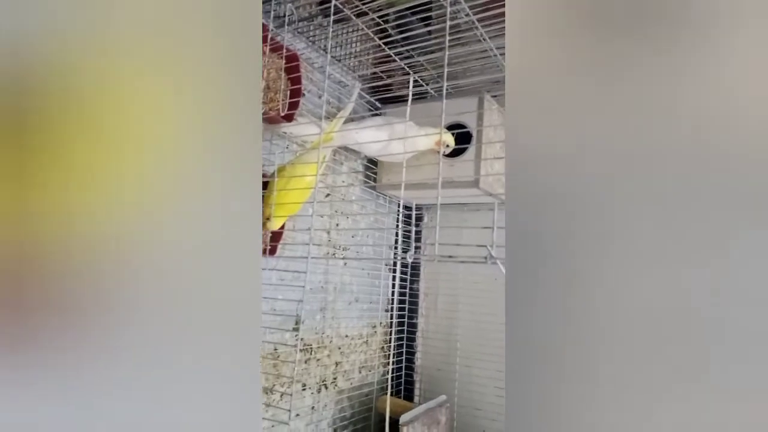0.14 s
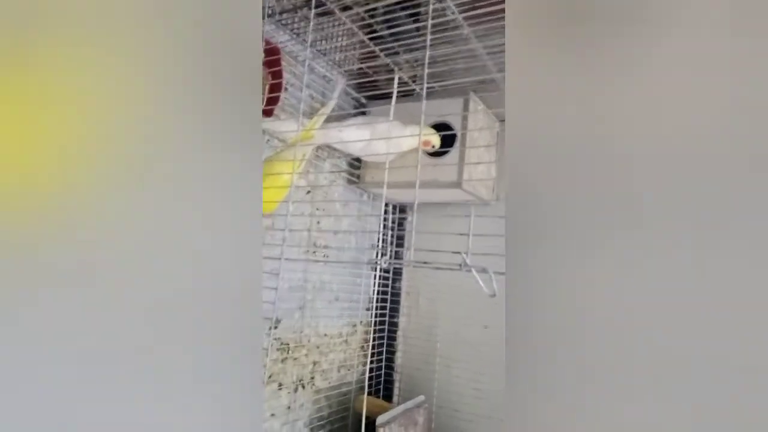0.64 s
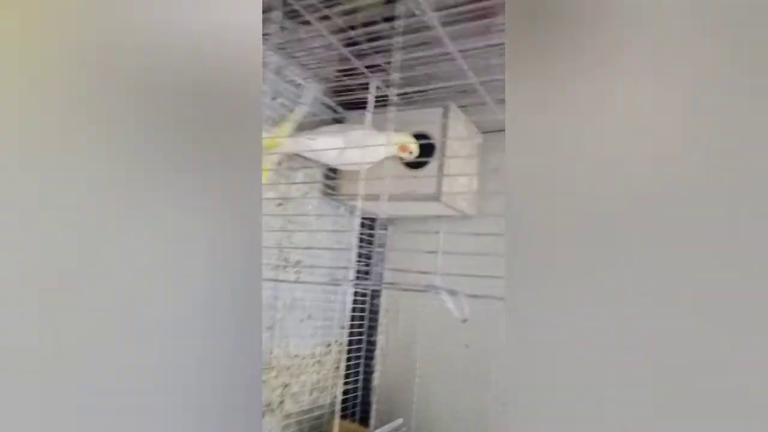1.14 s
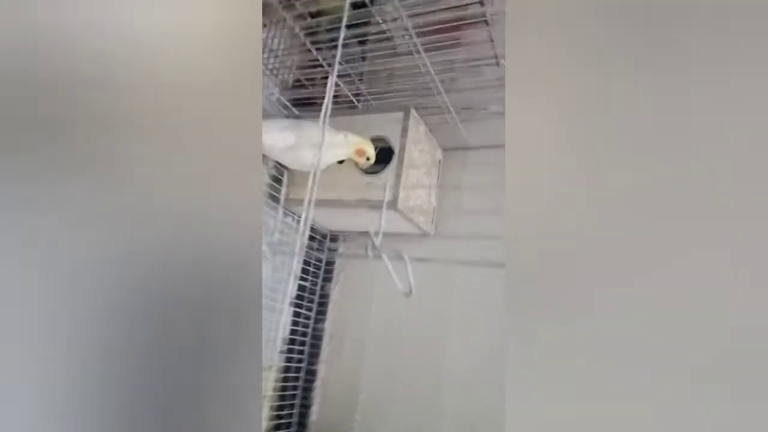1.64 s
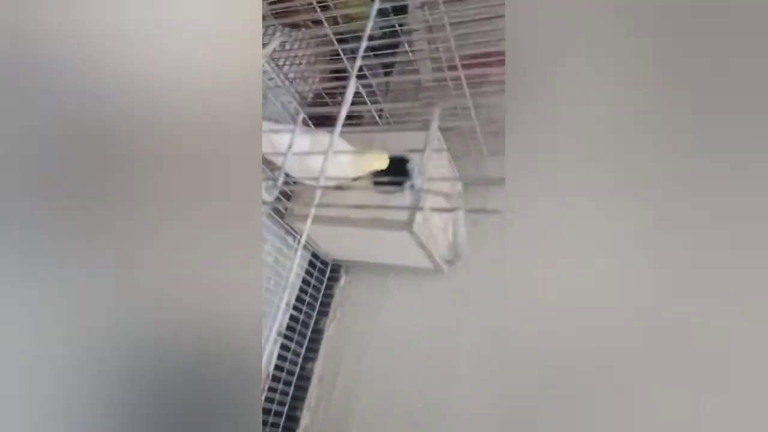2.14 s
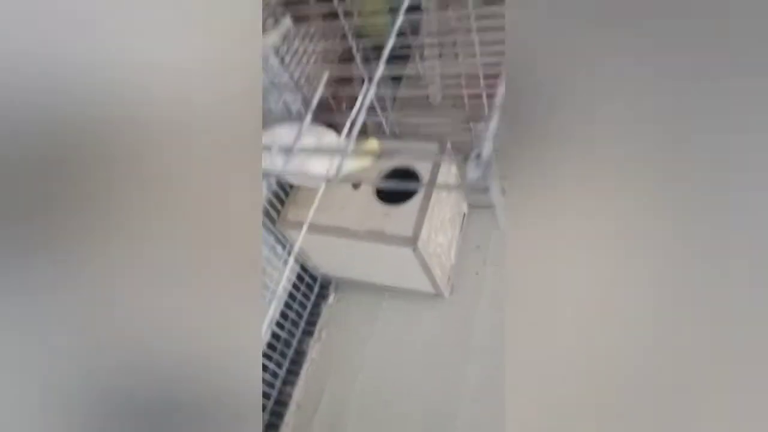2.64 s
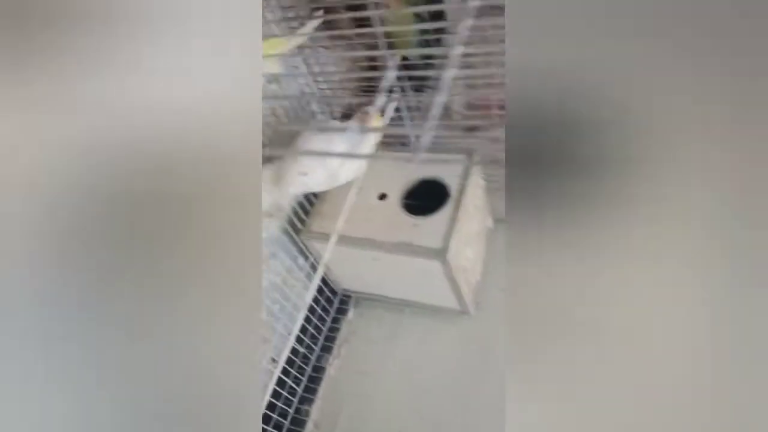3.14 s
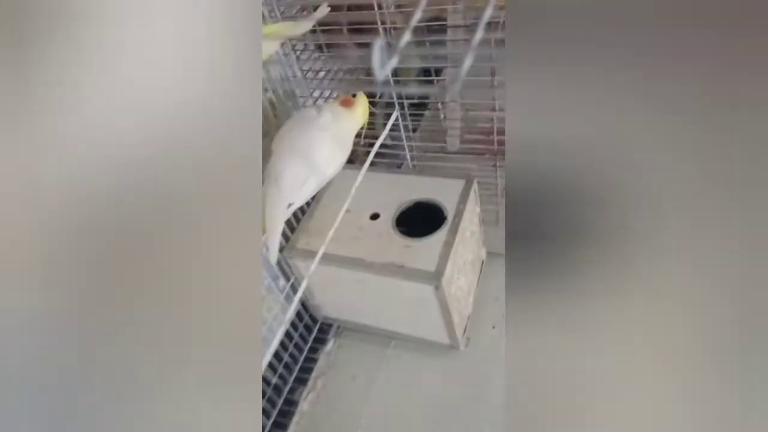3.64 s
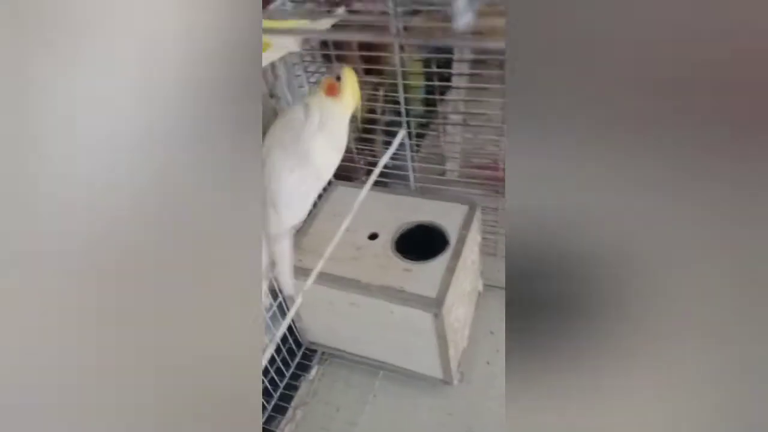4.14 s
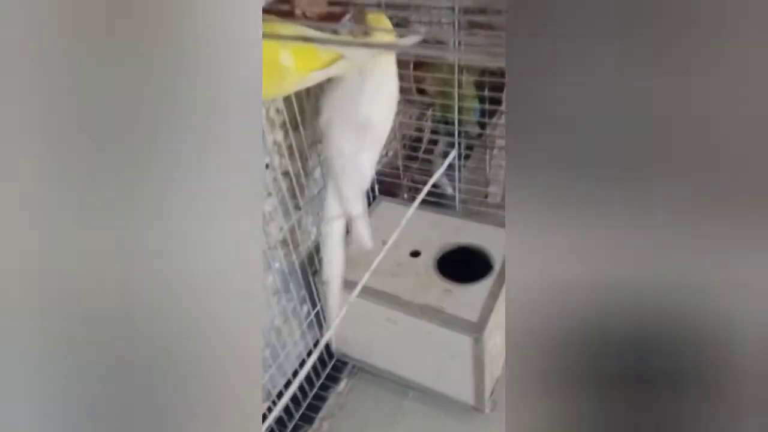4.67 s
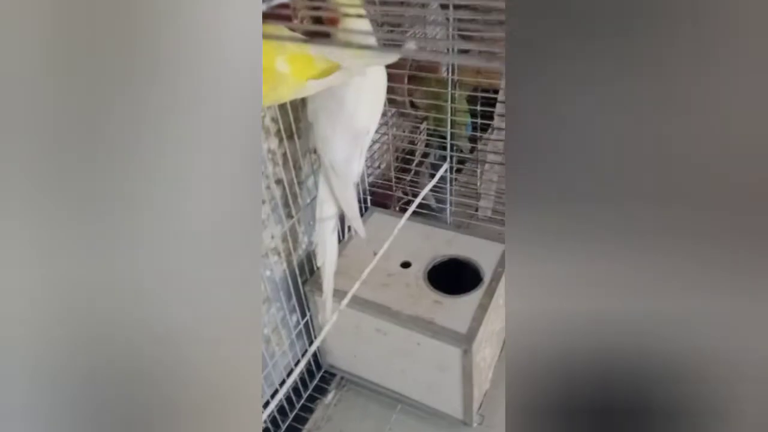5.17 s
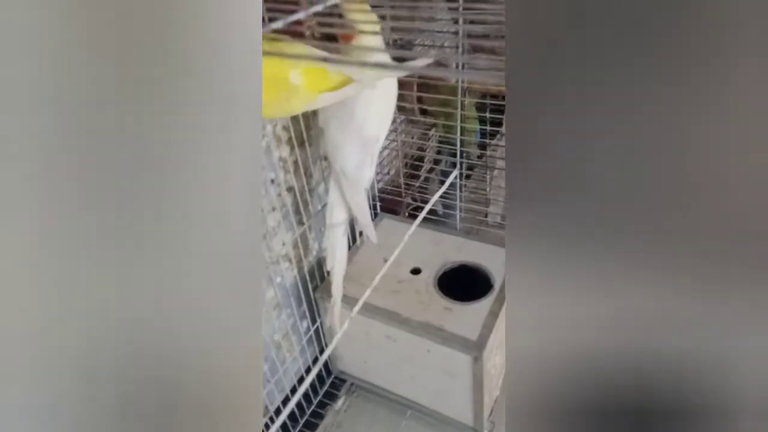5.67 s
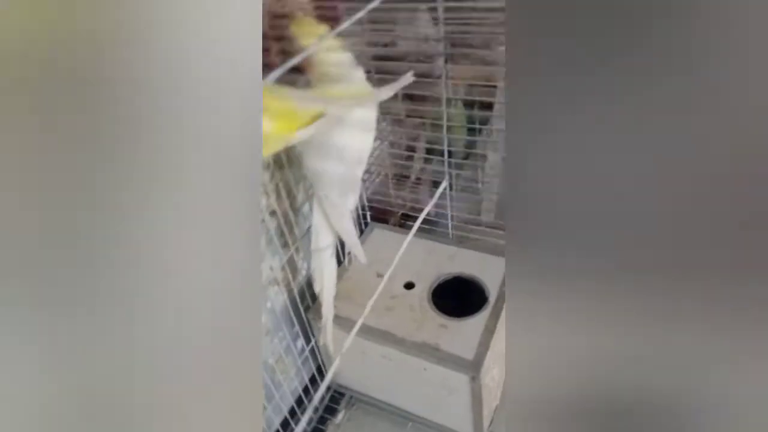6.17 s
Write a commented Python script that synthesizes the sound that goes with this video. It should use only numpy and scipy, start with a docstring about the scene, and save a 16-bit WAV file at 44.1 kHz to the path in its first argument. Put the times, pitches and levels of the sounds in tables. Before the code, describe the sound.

In a hard-walled room, small parrots give sparse chirps, nasal squawks and dry rasps over faint street rumble, claws tapping a hollow wooden box.

```python
"""A hard-walled room with small caged parrots, close to a hand-held phone; street rumble and far tones lie below.
The birds whistle (gliding near-sines), squawk (harmonic stacks) and rasp (trains of noisy air bursts).
Claws knock and shuffle on a wooden nest box (ringing modes), among short bright ticks (crack and ring) and grainy
treble swells. Filtered noise makes the rumble, room air and faint top rustles; sparse echoes make the room.
The phone's noise suppressor lowers the treble whenever it sinks near its floor."""
import sys
import numpy as np
from scipy import signal
from scipy.fft import rfft, irfft, next_fast_len
from scipy.io import wavfile
from scipy.ndimage import uniform_filter1d

SR = 44100
rng = np.random.default_rng(int(sys.argv[2]) if len(sys.argv) > 2 else 0)


def to_wav(sig):
    """Store sig (one row per channel, or 1-D mono) as 16-bit WAV at the path in sys.argv[1].

    Samples outside -1..1 are clipped; the rate is SR.
    """
    pcm = np.clip(np.atleast_2d(sig), -1, 1) * 32767
    pcm = np.round(pcm).astype(np.int16)
    wavfile.write(sys.argv[1], SR, pcm.T)  # frames by channels


def to_linear_factor(level_db):
    """Convert decibel levels (scalar or array-like) to linear amplitude factors."""
    exponent = np.asarray(level_db, float) / 20
    return 10 ** exponent


N = 277830


def evened(x):
    """Scales to rms 1."""
    return x / np.sqrt(np.mean(x ** 2) + 1e-20)


def read(points, hz):
    """Reads a spectrum on a log-frequency axis."""
    f, value = np.transpose(points)
    return np.interp(np.log(hz + 1), np.log(f + 1), value)


def add(mix, s, sound):
    """Mixes a sound in at time s."""
    part = mix[round(s * SR):][:len(sound)]
    part += sound[:len(part)]


def coloured(x, gain):
    """Filters by a gain given as a function of frequency."""
    return irfft(rfft(x) * gain(np.fft.rfftfreq(len(x), 1 / SR)), len(x))


def wobble(size, span):
    """Slow random drift of rms 1, smoothed twice over span samples."""
    return evened(uniform_filter1d(uniform_filter1d(rng.standard_normal(size), span), span))


# swell of the street above about 90 Hz: (time [s], level [dB])
RUMBLE_SWELL = [(0.0, -81.5), (1.19, -75), (1.61, -67), (1.912, -75.5), (2.389, -75.5), (2.79, -65.5),
                (3.16, -71), (3.58, -69.5), (3.74, -75), (4.51, -63.5), (4.769, -70), (5.509, -67.5),
                (6.3, -76.5)]
# colour of the street noise: (frequency [Hz], relative level [dB])
STREET_COLOUR = [(25, -28), (59, 8), (165, -5), (237, -14.5), (429, -12.5), (525, -23.5), (800, -21.5),
                 (1040, -28.5), (1760, -120)]
DEEP_DB, DEEP_SWING = -82, 0.86  # mean level below 90 Hz; dB of deep swell per dB of upper swell


def street_rumble():
    """Lumpy low noise in two bands split near 90 Hz, swelling together."""
    t = np.arange(N) / SR
    s, upper_db = np.transpose(RUMBLE_SWELL)
    deep_db = DEEP_DB + DEEP_SWING * (upper_db - upper_db.mean())
    deep_gain = lambda hz: to_linear_factor(read(STREET_COLOUR, hz)) / (1 + (hz / 90) ** 6)
    upper_gain = lambda hz: to_linear_factor(read(STREET_COLOUR, hz)) / (1 + (90 / (hz + 1)) ** 6)
    deep = evened(coloured(rng.standard_normal(N), deep_gain))
    upper = evened(coloured(rng.standard_normal(N), upper_gain))
    deep = deep * to_linear_factor(np.interp(t, s, deep_db) + 2.88 * wobble(N, 2500))
    return deep + upper * to_linear_factor(np.interp(t, s, upper_db) + 1.0 * wobble(N, 900))


# colour of the room air: (frequency [Hz], relative level [dB])
AIR_COLOUR = [(500, 1), (868, -10.5), (1060, -9), (1870, -11), (4210, -19.5), (6510, -26.5), (16000, -27)]
AIR_DB = -78


def room_air():
    """A thin, nearly steady hiss of noise."""
    gain = lambda hz: to_linear_factor(read(AIR_COLOUR, hz)) / (1 + (700 / (hz + 1)) ** 4)
    air = evened(coloured(rng.standard_normal(N), gain))
    return air * to_linear_factor(AIR_DB + 0.12 * wobble(N, 500))


# far tones from the street: (start [s], end [s], mean frequency [Hz], mean peak level [dB])
FAR_TONES = [(0, 0.487, 192, -78.5), (1.283, 1.642, 195.6, -65), (2.965, 3.55, 350.3, -70),
             (3.132, 3.628, 786, -73.5), (5.02, 5.125, 434, -61.5), (5.12, 5.287, 402.5, -68),
             (5.353, 5.649, 150, -66)]


def far_tones():
    """Sines that waver in pitch and level and fade in and out."""
    out, t = np.zeros(N), np.arange(N) / SR
    for t0, t1, hz, db in FAR_TONES:
        fade = np.clip(np.minimum(t - t0, t1 - t) / 0.021, 0, 1)
        level = to_linear_factor(db + 4.5 * wobble(N, 600))
        cycles = np.cumsum(hz * (1 + .015 * wobble(N, 1200))) / SR
        out += level * fade * np.sin(2 * np.pi * cycles)
    return out


RUSTLES_PER_S, RUSTLE_DB, RUSTLE_HZ = 7.3, -93, 15430  # mean rate, overall rms level, centre


def rustles():
    """Sparse soft puffs of the highest treble at random times, a few of them larger."""
    starts = rng.random(N) < RUSTLES_PER_S / SR
    size = to_linear_factor(4.67 * np.minimum(rng.exponential(1, N), 1.6)) * starts
    n = np.arange(3000)
    swell = to_linear_factor(-60 * n / SR / 0.058) * np.minimum(n / 150, 1)
    puffs = signal.fftconvolve(size, swell)[:N] * rng.standard_normal(N)
    gain = lambda hz: 0.075 * (hz > 3000) + 1 / (1 + ((hz - RUSTLE_HZ) / 900) ** 2)
    return to_linear_factor(RUSTLE_DB) * evened(coloured(puffs, gain))


# short bright ticks: (time [s], peak level of the crack [dB], centre frequency [Hz])
BRIGHT_TICKS = [(0.2189, -62.5, 3760), (1.068, -59, 1882), (1.4634, -38.5, 12240), (2.15, -52.5, 14800),
                (2.81, -60.5, 2440), (4.6565, -53, 15730), (4.896, -49, 9400), (5.3071, -51.5, 7960),
                (5.967, -56, 14800), (6.1785, -47, 15200)]


def ticks():
    """A noise crack of a few milliseconds, with a faint brief ring at the tick's own pitch."""
    out, t = np.zeros(N), np.arange(4096) / SR
    for s, db, centre_hz in BRIGHT_TICKS:
        crack = rng.standard_normal(4096) * to_linear_factor(-60 * t / 0.0073) * np.minimum(t / 0.00062, 1)
        crack = coloured(crack, lambda hz: 0.39 * (hz > 1500) + 1 / (1 + ((hz - centre_hz) / 2500) ** 2))
        ring_level = to_linear_factor(-30 - 60 * t / .04 + 3 * wobble(4096, 100))
        ring = ring_level * np.sin(2 * np.pi * centre_hz * t)
        add(out, s, to_linear_factor(db) * (crack / abs(crack).max() + ring))
    return out


# voicing and distance of the calls: (from [s], overtone lift [dB], slope above the 2nd partial [dB/octave],
# hoarseness [dB], room echo [dB])
CALL_VOICES = [(0, -12, 3, -22, -7.5), (.6, -21, -2, -40, -7), (.85, 7, -8.5, -22, -3.5),
               (1.06, 16.5, 6.5, -14, -4.5), (1.1, -0.5, -6, -12, -2), (1.19, 15, -10, -8, -2.5),
               (1.255, 5.5, 4, -14.5, -2.5), (1.395, 5, -9.5, -15.5, -4.5), (1.6, 1.5, 2, -19, -8.5),
               (1.77, -6.5, -0.5, -23, -6.5), (1.95, -15, 0.5, -48, -8.5), (2.24, -7, 1.5, -26, -2.5),
               (2.29, -6.5, -1, -15.5, -7.5), (2.44, -11, 7, -41, -10), (2.6, -3.5, 18.5, -30, -7),
               (2.8, -2, 2.5, -26, -7.5), (3.07, -16.5, 11, -11, -9.5), (3.25, -9, -4, -10.5, -6),
               (3.33, -2.5, 3, -26.5, -11), (3.44, 3.5, 8, -16.5, -9), (3.85, -6.5, -7.5, -18.5, -6),
               (3.995, 5, -3, -19, -11), (4.045, -4.5, -14, -14.5, -11), (4.11, 8.5, -17, -30, -8.5),
               (4.16, -2.5, 5, 1, -3.5), (4.4, 6.5, 6.5, -20, -9.5), (4.92, 17.5, -0.5, -16.5, -10),
               (4.99, 9, 12, -22, -8), (5.05, 9, -5.5, -23, -7), (5.16, -2, -0.5, -34, -7),
               (5.33, 5, -6, -26, -8), (5.47, -7.5, -2, -37, -8.5), (5.67, 5, -11.5, -48, -8),
               (5.87, -2, -14, -39, -9), (5.916, -13.5, -20, -30, -10.5), (5.926, 4, -23, -31, -4.5),
               (5.95, -12, 0.5, -52, -11.5), (6.075, 15.5, -23, -16.5, -11), (6.15, 0, -15, -54, -8.5)]


def voice(t):
    """Overtone lift, slope, hoarseness and echo level of the call sounding at time t."""
    start, *columns = np.transpose(CALL_VOICES)
    return np.array(columns)[:, np.maximum(np.searchsorted(start, t) - 1, 0)]


ONSET_S, CUTOFF_S, GLIDE_S = .003, .002, .001  # a breath opens and closes; the throat rounds off pitch corners


def breath(curve):
    """Time, pitch and amplitude read from one curve of a call."""
    s, hz, db = np.transpose(curve)
    s = np.maximum.accumulate(s)
    t = np.arange(s[0], s[-1], 1 / SR)
    opening = (t - t[0]) / min(ONSET_S, 0.64 * (t[-1] - t[0]))
    closing = (t[-1] - t) / CUTOFF_S
    edges = np.clip(np.minimum(opening, closing), 0, 1)
    span = max(round(GLIDE_S * SR), 1)
    smooth = lambda v: uniform_filter1d(np.interp(t, s, v), size=span, mode="nearest")
    return t, smooth(hz), to_linear_factor(smooth(db)) * np.sin(edges * np.pi / 2) ** 2


def glides(notes):
    """Short notes as straight two-point curves."""
    return [[(s, a_hz, db), (s + ms / 1000, b_hz, db)] for s, ms, a_hz, b_hz, db in notes]


EFFORT = 0.48  # dB gained by each of the first two overtone steps per dB of loudness within a curve


def sing(notes, partial_db, count, jitter, shimmer_db, fastest):
    """Harmonics on each breath's pitch; hoarse air rides on them as fast random flutter."""
    out, k = np.zeros(N), np.arange(1, count + 1)[:, None]
    drift, flutter = 1 + jitter * wobble(N, 45), wobble(N, fastest)
    fading_db = np.array([3.5 * wobble(N, 250) for _ in k])  # each overtone's level drifts slowly at random
    shimmer = to_linear_factor(shimmer_db * wobble(N, 65))
    for t, hz, level in map(breath, notes):
        at = np.minimum((t * SR).astype(int), N - 1)
        lift_db, slope_db, hoarse_db, _ = uniform_filter1d(voice(t), size=150, mode="nearest")
        effort_db = EFFORT * np.maximum(20 * np.log10(level / level.max() + 1e-9), -30)
        overtone_db = lift_db + slope_db * np.log2(k / 2) + np.minimum(k - 1, 2) * effort_db + fading_db[:, at]
        gains = to_linear_factor(partial_db(k, hz) + (k > 1) * overtone_db) * (k * hz < SR / 2)
        cycles = np.cumsum(hz * drift[at]) / SR
        stack = (gains * np.cos(2 * np.pi * k * cycles + np.pi + 0.14 * k ** 2)).sum(0)
        stack = stack * np.sqrt(2 / (gains ** 2).sum(0))
        add(out, t[0], level * shimmer[at] * (1 + to_linear_factor(hoarse_db) * flutter[at]) * stack)
    return out


# whistled warbles, in one or more curves each: (time [s], pitch [Hz], level [dB])
WHISTLE_CURVES = [
    [(0.441, 3700, -61), (0.446, 3285, -40), (0.45, 2950, -56), (0.455, 2367, -51.5), (0.462, 2334, -53),
     (0.47, 2155, -65), (0.477, 2632, -51.5), (0.494, 2327, -59), (0.501, 1974, -54.5), (0.507, 1500, -69),
     (0.533, 1473, -64), (0.556, 1500, -64)],
    [(0.643, 3410, -64), (0.652, 3484, -49.5), (0.657, 2490, -50), (0.672, 2425, -53), (0.677, 2047, -77),
     (0.692, 2720, -52), (0.697, 2080, -62), (0.717, 2090, -62)],
    [(0.876, 2100, -69), (0.89, 2270, -57.5), (0.893, 2694, -53.5), (0.899, 2704, -47.5),
     (0.908, 2175, -52), (0.911, 2760, -70), (0.936, 3460, -62), (0.948, 2550, -67)],
    [(1.221, 4170, -69), (1.231, 4560, -46.5), (1.237, 5180, -33.5), (1.249, 4720, -52), (1.258, 5070, -36),
     (1.26, 4900, -23)],
    [(1.258, 4673, -34.5), (1.269, 4484, -32.5), (1.274, 3844, -22), (1.278, 3860, -30.5),
     (1.288, 4354, -26), (1.294, 4620, -25.5), (1.31, 4550, -33), (1.332, 4552, -34.5), (1.4, 4490, -44.5)],
    [(1.41, 3684, -49), (1.418, 2634, -38), (1.425, 2450, -38.5), (1.428, 1876, -50), (1.437, 1500, -52)],
    [(1.435, 2290, -48), (1.44, 2490, -55), (1.443, 3550, -43.5), (1.457, 3470, -42.5), (1.48, 1920, -49.5),
     (1.501, 1438, -54.5), (1.53, 1407, -64)],
    [(1.62, 1710, -51), (1.625, 2385, -44.5), (1.63, 2755, -38.5), (1.638, 2793, -58), (1.642, 3160, -52),
     (1.647, 3180, -40.5), (1.651, 2330, -53), (1.655, 1500, -51), (1.66, 3000, -59), (1.665, 3230, -54.5),
     (1.67, 3480, -56), (1.678, 3080, -46.5), (1.682, 3130, -58)],
    [(1.968, 2575, -70), (1.978, 2560, -50), (1.984, 2190, -55), (1.992, 3143, -44.5), (1.999, 2924, -46),
     (2.011, 3226, -42.5), (2.02, 2200, -47), (2.042, 3190, -69)],
    [(2.605, 3670, -85), (2.624, 3360, -49), (2.63, 2770, -54.5), (2.649, 3500, -53.5), (2.66, 2384, -51),
     (2.662, 1544, -51), (2.677, 1886, -52.5), (2.684, 1912, -68), (2.694, 2610, -37), (2.709, 1318, -61),
     (2.724, 1735, -46), (2.727, 1720, -67)],
    [(2.82, 2910, -47.5), (2.828, 2945, -48), (2.832, 2874, -58.5), (2.838, 2342, -39.5),
     (2.86, 3010, -47.5), (2.865, 3176, -57.5), (2.89, 2930, -50.5), (2.895, 1910, -46.5),
     (2.91, 1866, -79), (2.919, 2512, -37.5), (2.927, 2330, -45), (2.936, 1676, -48.5),
     (2.943, 1425, -55.5), (2.954, 1823, -42), (2.968, 1500, -67)],
    [(3.088, 3080, -61.5), (3.102, 2355, -47), (3.113, 2368, -42), (3.118, 1940, -60), (3.128, 1862, -54),
     (3.137, 2793, -51.5), (3.152, 2260, -56)],
    [(3.458, 2795, -58), (3.462, 2542, -45), (3.484, 2360, -47.5), (3.486, 1870, -51.5), (3.496, 2145, -62),
     (3.512, 2840, -52.5)],
    [(4.421, 2753, -41), (4.426, 3560, -39), (4.433, 3302, -89), (4.441, 2410, -37), (4.449, 3326, -85),
     (4.459, 2326, -43.5), (4.472, 2743, -47), (4.475, 3430, -44), (4.504, 1933, -46.5),
     (4.515, 2960, -48.5), (4.52, 2586, -38.5), (4.527, 2068, -43.5), (4.548, 1470, -52.5),
     (4.55, 2775, -57.5), (4.572, 2412, -45), (4.577, 1740, -65.5), (4.587, 1600, -51)],
    [(5.488, 2450, -39), (5.494, 3643, -44.5), (5.518, 3110, -46.5), (5.534, 3630, -43.5),
     (5.544, 2770, -48), (5.547, 1835, -40), (5.556, 2454, -46), (5.568, 2400, -50.5), (5.578, 2915, -30.5),
     (5.586, 2847, -35), (5.589, 1950, -35.5), (5.594, 1586, -45.5), (5.602, 1864, -34.5),
     (5.63, 2930, -57)],
    [(5.683, 5880, -47), (5.693, 3814, -28), (5.698, 3048, -33), (5.703, 3105, -23), (5.709, 3952, -27),
     (5.723, 2975, -24), (5.729, 3730, -20.5), (5.74, 3576, -36), (5.751, 2278, -30), (5.758, 2305, -39),
     (5.762, 2840, -29.5), (5.769, 3050, -25.5), (5.782, 2420, -37), (5.786, 1875, -35.5),
     (5.794, 2168, -38), (5.81, 1695, -37)],
    [(6.163, 2280, -48.5), (6.174, 1640, -42), (6.179, 1970, -70), (6.182, 3590, -53), (6.187, 2920, -33.5),
     (6.199, 1883, -42.5), (6.208, 3020, -46), (6.218, 3700, -54), (6.223, 2570, -39), (6.227, 3170, -48),
     (6.244, 1748, -41.5), (6.253, 1913, -38.5), (6.265, 1212, -45), (6.275, 2210, -56),
     (6.28, 2460, -43.5), (6.299, 1320, -51)],
]
# short pure side notes: (time [s], length [ms], start pitch [Hz], end pitch [Hz], level [dB])
PEEP_NOTES = [(1.2, 13, 1680, 1710, -64.5), (1.262, 9.1, 2850, 2540, -41), (1.396, 10, 1800, 1696, -51.5),
              (4.549, 17, 1350, 1150, -55), (5.015, 28.3, 4000, 3780, -55), (6.086, 2.8, 2840, 2860, -25)]
# the second syrinx half chops a whistle: (start [s], end [s], mean beat rate [1/s], depth [0-1])
SYRINX_BEATS = [(1.262, 1.4, 215, 0.45)]
# base levels of whistle partials 1 to 4: (level [dB])
WHISTLE_PARTIALS = [14, -16.5, -25.5, -49.5]
# the throat on the whistle's overtones: (frequency [Hz], gain [dB])
WHISTLE_THROAT_GAIN = [(4000, 12.5), (5000, -10.5), (6200, 4.5), (7800, -8.5), (9100, 11), (11200, -23),
                       (13600, 12.5)]


def whistles():
    """A near sine with overtones; a second vibration at times adds sidebands below it."""
    clock, beats = np.arange(N) / SR, np.ones(N, complex)
    for t0, t1, per_s, depth in SYRINX_BEATS:
        turn = np.exp(-2j * np.pi * np.cumsum(per_s * (1 + 0.09 * wobble(N, 200))) / SR)
        fade = np.clip(np.minimum(clock - t0, t1 - clock) / ONSET_S, 0, 1)
        beats += (depth * turn + 0.97 * depth ** 2 * turn ** 2) * fade
    base_db = np.array(WHISTLE_PARTIALS)[:, None]
    partial_db = lambda k, hz: base_db + (k > 1) * read(WHISTLE_THROAT_GAIN, k * hz)
    notes = WHISTLE_CURVES + glides(PEEP_NOTES)
    pure = sing(notes, partial_db, count=4, jitter=.008, shimmer_db=2.5, fastest=24)
    # the analytic signal lets each beat shift the whistle downwards only
    return (signal.hilbert(pure, next_fast_len(N))[:N] * beats).real


# dull modes of the wooden box: (frequency [Hz], level at the spot's own pitch [dB], free decay t60 [s])
BOX_MODES = [(163, -6, 0.077), (188, -7, 0.18), (260, 2, 0.033), (340, -4.5, 0.16), (470, 8, 0.015),
             (612, -1.5, 0.076), (930, 14.5, 0.01), (1500, -1, .008)]


def box(spot_hz, db_per_octave):
    """The ring of the box's wooden modes, favouring those near the pitch of the spot touched."""
    t, (hz, db, t60) = np.arange(4000) / SR, np.transpose(BOX_MODES)[:, :, None]
    sign = (-1) ** np.arange(len(BOX_MODES))[:, None]
    mode_db = db - 60 * t / t60 - db_per_octave * abs(np.log2(hz / spot_hz))
    modes = sign * np.sin(2 * np.pi * hz * t) * to_linear_factor(mode_db)
    return modes.sum(0) * np.minimum(t / 0.00054, 1)


def radiated(x):
    """A small box radiates no deep bass."""
    return coloured(x, lambda hz: 1 / (1 + (140 / (hz + 1)) ** 4))


# feet shuffling on the box: (time [s], length [ms], level before the bass cut [dB], pitch of the spot [Hz])
FOOT_SHUFFLES = [(0.51, 62, -66.5, 275), (0.642, 48, -69, 318), (3.932, 81, -67, 260),
                 (4.174, 26.6, -42.5, 270), (4.209, 28, -51.5, 202), (4.246, 17.6, -53, 253),
                 (4.261, 16, -55.5, 260), (4.314, 78, -53.5, 328), (5.353, 59, -58.5, 340)]


def shuffles():
    """Feet drive the box with a swell of noise, and its modes answer."""
    out, t = np.zeros(N), np.arange(4000) / SR
    for s, ms, db, spot_hz in FOOT_SHUFFLES:
        rub = rng.standard_normal(4000) * np.sin(np.pi * np.minimum(t * 1000 / ms, 1)) ** .5
        answer = evened(signal.fftconvolve(rub, box(spot_hz, db_per_octave=17)))
        add(out, s, to_linear_factor(db) * answer * np.sqrt(ms / 1000 * SR / 8000))
    return radiated(out)


# nasal calls, in one or more curves each: (time [s], pitch [Hz], level [dB])
SQUAWK_CURVES = [
    [(1.783, 1333, -74.5), (1.792, 1134, -53), (1.797, 1078, -69.5), (1.805, 1210, -52.5),
     (1.807, 1491, -51.5), (1.82, 1260, -52.5), (1.85, 1434, -57), (1.89, 1290, -78.5)],
    [(2.256, 585, -57.5), (2.272, 741, -52), (2.285, 768, -45), (2.296, 890, -51), (2.31, 764, -51),
     (2.322, 851, -52), (2.33, 1140, -53), (2.342, 911, -57.5), (2.38, 1134, -67)],
    [(3.266, 1064, -60.5), (3.272, 1118, -46), (3.285, 864, -50.5), (3.31, 1085, -49), (3.334, 1052, -58.5),
     (3.35, 1100, -68), (3.356, 1168, -57), (3.38, 1150, -57), (3.394, 1093, -82.5), (3.402, 1230, -60),
     (3.415, 1270, -60)],
    [(3.868, 1037, -56), (3.879, 915, -53.5), (3.897, 896, -62.5), (3.899, 717, -46.5), (3.913, 808, -53),
     (3.937, 756, -71), (3.939, 1067, -50), (3.951, 964, -57), (3.982, 930, -52)],
    [(4.006, 1253, -72), (4.012, 1290, -47.5), (4.022, 1181, -52.5), (4.032, 960, -61.5),
     (4.038, 1564, -55), (4.047, 1360, -56), (4.053, 1008, -54.5), (4.085, 831, -54), (4.103, 945, -59.5)],
    [(4.12, 1343, -62), (4.125, 1367, -41), (4.134, 1312, -48), (4.142, 995, -51), (4.15, 1275, -70.5),
     (4.17, 1083, -63.5), (4.204, 1145, -59.5), (4.214, 1000, -58.5)],
    [(5.059, 2036, -53), (5.072, 1740, -42), (5.075, 1443, -43), (5.09, 1234, -47.5), (5.098, 1210, -75),
     (5.101, 1307, -52), (5.122, 1083, -56), (5.134, 1350, -59), (5.146, 1230, -50)],
    [(5.176, 1350, -77.5), (5.18, 1640, -55), (5.189, 1842, -40), (5.197, 1403, -54.5), (5.204, 1750, -65),
     (5.217, 1816, -58), (5.231, 1280, -70.5), (5.239, 1243, -46), (5.246, 1500, -54.5), (5.257, 1157, -56),
     (5.272, 1314, -63)],
    [(5.887, 960, -46), (5.892, 1135, -46), (5.899, 1240, -38.5), (5.904, 900, -50)],
    [(5.906, 897, -39), (5.91, 1000, -37.5), (5.913, 1490, -37), (5.919, 1950, -35.5), (5.925, 1802, -37.5),
     (5.929, 1277, -38.5), (5.939, 1485, -43), (5.944, 1384, -38.5), (5.958, 1396, -56),
     (6.004, 1202, -46.5), (6.04, 1246, -46), (6.069, 1388, -53.5), (6.076, 1260, -63)],
]
# short nasal chips: (time [s], length [ms], start pitch [Hz], end pitch [Hz], level [dB])
CHIP_NOTES = [(.801, 34, 1414, 1330, -75), (1.082, 4.2, 2660, 2420, -38), (1.1105, 6, 2755, 3400, -34.5),
              (1.122, 5.5, 3235, 3500, -40.5), (1.231, 2, 2130, 2180, -34), (1.241, 8.2, 2667, 2765, -35),
              (4.934, 11, 1637, 1567, -37), (4.996, 8.9, 1906, 2026, -43.5),
              (6.083, 4.55, 1850, 2370, -32.5)]
# the throat on the squawks: (frequency [Hz], gain [dB])
SQUAWK_THROAT_GAIN = [(600, -5.5), (1000, -2.5), (1800, 3.5), (2600, 7), (3600, -1), (5200, -15.5),
                      (6400, -18.5), (7600, -34), (9000, -20.5), (10500, -45), (15000, -53.5)]


def squawks():
    """A full harmonic stack, each partial weighted by the throat."""
    partial_db = lambda k, hz: read(SQUAWK_THROAT_GAIN, k * hz)
    notes = SQUAWK_CURVES + glides(CHIP_NOTES)
    return sing(notes, partial_db, count=16, jitter=.013, shimmer_db=1.2, fastest=18)


# harsh rasps: (time [s], length [ms], mean burst rate [1/s], level [dB], tilt [dB/octave],
# mouth resonance [Hz], its fall-off [dB/octave])
RASP_CALLS = [(1.113, 30.6, 190, -45.5, 6, 5000, 5), (1.257, 52, 195, -40.5, 6, 4440, 8),
              (2.4535, 85, 160, -44, -1, 3340, 3), (3.268, 52.4, 193, -51.5, -17, 3300, 14.5),
              (3.877, 40.6, 206, -54, 1, 2970, -0.5), (4.113, 9.5, 216, -54, 2.5, 3030, 1.5),
              (4.552, 11.5, 184, -55, 3.5, 3000, 19.5), (5.167, 18, 183, -56, -2, 3000, 10),
              (5.348, 15, 465, -45, -3.5, 2200, -5.5), (5.363, 15, 290, -36, -3, 2800, 5),
              (5.374, 18.4, 208, -30, 4.5, 3600, 3.5), (5.3947, 37.7, 190, -31.5, 4, 4800, 5),
              (5.888, 21, 144, -50.5, -11, 2700, 16)]
# the throat on the rasps: (frequency [Hz], gain [dB])
RASP_THROAT_GAIN = [(180, -65), (300, -24.5), (1300, -3.5), (2280, 0), (3190, 0), (3640, 3), (4160, -5),
                    (5700, -10.5), (9390, -28.5), (10200, -44), (14700, -26), (16000, -77.5)]
RASP_VOICE_HZ, RASP_VOICED = 827, 0.68  # mean pitch of a low voice inside each burst; its share 0-1


def rasps():
    """Each opening of the folds lets out a few milliseconds of voiced noise, shaped by throat and mouth."""
    out, size = np.zeros(N), 8192
    t = np.arange(size) / SR
    for s, ms, per_s, db, tilt_db, mouth_hz, focus_db in RASP_CALLS:
        length = ms / 1000
        turns = np.cumsum(per_s * (1 + 0.05 * wobble(size, 150))) / SR
        cycles = np.cumsum(RASP_VOICE_HZ * (1 + 0.043 * wobble(size, 300))) / SR
        folds = sum(to_linear_factor(5 * wobble(size, 350)) * np.cos(2 * np.pi * k * cycles + k ** 2) for k in range(1, 19))
        air = RASP_VOICED * evened(folds) + (1 - RASP_VOICED) * rng.standard_normal(size)
        bursts = (.24 + np.exp(-((turns % 1 - .5) / .24) ** 2)) * to_linear_factor(2.8 * wobble(size, 160))
        gate = np.clip(np.minimum(t / (0.19 * length), (length - t) / (0.097 * length)), 0, 1)
        octaves = lambda hz: np.log2((hz + 1) / mouth_hz).clip(-2, 2)
        mouth_db = lambda hz: tilt_db * octaves(hz) - focus_db * abs(octaves(hz))
        sound = coloured(bursts * air * gate, lambda hz: to_linear_factor(read(RASP_THROAT_GAIN, hz) + mouth_db(hz)))
        add(out, s, to_linear_factor(db) * evened(sound) * np.sqrt(length * SR / size))
    return out


# claws knocking on the box: (time [s], strike level before the bass cut [dB], pitch of the spot struck [Hz])
CLAW_KNOCKS = [(2.049, -47.5, 604), (2.06, -51, 414), (2.132, -35.5, 344), (2.746, -34, 337),
               (2.768, -50, 400), (2.81, -56.5, 786), (2.928, -47, 400), (2.955, -38, 363)]
KNOCK_T60_S = 0.04  # the foot damps the ring, on top of each mode's own decay


def knocks():
    """Single blows ring the box briefly."""
    out, t = np.zeros(N), np.arange(4000) / SR
    for s, db, spot_hz in CLAW_KNOCKS:
        add(out, s, to_linear_factor(db - 60 * t / KNOCK_T60_S) * box(spot_hz, db_per_octave=23))
    return radiated(out)


# short grainy swells of very high noise: (time [s], length [ms], level [dB], centre frequency [Hz])
TREBLE_SWELLS = [(3.315, 20, -70.5, 14720), (3.352, 46, -72.5, 8900), (3.47, 36, -71.5, 14100),
                 (5.862, 11, -69.5, 14800)]


def treble_swells():
    """A short arch of very high noise, made grainy by fast random level changes."""
    out, t = np.zeros(N), np.arange(4096) / SR
    for s, ms, db, centre_hz in TREBLE_SWELLS:
        arch = np.sin(np.pi * np.minimum(t * 1000 / ms, 1)) ** .5
        grains = rng.standard_normal(4096) * to_linear_factor(4 * wobble(4096, 40)) * arch
        swell = coloured(grains, lambda hz: .5 * (hz > 4000) + 1 / (1 + ((hz - centre_hz) / 2000) ** 2))
        add(out, s, to_linear_factor(db) * evened(swell) * np.sqrt(ms / 1000 * SR / 4096))
    return out


# reverberation of the room: (frequency [Hz], late decay t60 [s])
ROOM_DECAY = [(300, 0.077), (1500, 0.52), (3000, 0.35), (5000, 0.44), (9000, 0.37), (15000, 0.39)]
# what the walls send back: (frequency [Hz], relative level [dB])
WALL_COLOUR = [(4000, 0.5), (7000, -5), (10000, -7), (15000, 0)]
EARLY_DB, EARLY_S = 6, 0.038  # the near walls lift the first echoes; time constant of that lift


def room(x):
    """Sparse echoes of random sign after 3 ms, each band dying at its own speed."""
    taps = np.zeros(SR)
    at = np.arange(130, SR - 20, 20)
    taps[at + rng.integers(0, 20, len(at))] = rng.choice([-1., 1.], len(at))
    hz, t, z = signal.stft(taps, SR, nperseg=256)
    early_db = EARLY_DB * np.exp(-t / EARLY_S)
    decay_db = -60 * t / read(ROOM_DECAY, hz)[:, None]
    gain = to_linear_factor(read(WALL_COLOUR, hz)[:, None] + early_db + decay_db)
    tail = signal.istft(z * gain, SR, nperseg=256)[1]
    return signal.fftconvolve(x, tail / np.linalg.norm(tail))[:N]


def scene():
    """Birds, box noises, ticks and swells with their room echo, over the background."""
    birds = whistles() + squawks() + rasps()
    noises = knocks() + shuffles() + ticks() + treble_swells()
    echo = to_linear_factor(uniform_filter1d(voice(np.arange(N) / SR)[-1], size=100))
    echoes = room(echo * birds + to_linear_factor(-8.0) * noises)
    background = street_rumble() + room_air() + far_tones()
    return (birds + noises + echoes + background + rustles())[None]


def top_cut(x):
    """Nothing passes above the cut-off."""
    return signal.sosfilt(signal.butter(12, 16490, fs=SR, output="sos"), x)


# response of the phone's microphone: (frequency [Hz], gain [dB])
MICROPHONE_RESPONSE = [(10500, 0.5), (14500, 1), (15400, -1), (15900, -15), (16500, -27.5)]


def record(dry):
    """The microphone port slightly lifts the top below a steep fall; the suppressor closes on quiet treble."""
    heard = coloured(dry[0], lambda hz: to_linear_factor(read(MICROPHONE_RESPONSE, hz)))
    treble = coloured(heard, lambda hz: 1 / (1 + (650 / (hz + 1)) ** 4))
    level_db = 10 * np.log10(abs(uniform_filter1d(treble ** 2, size=600)) + 1e-12)
    shut_db = np.clip(3.5 * (level_db + 77.0), -7, 0)  # starts below -77 dB, at most 7 dB
    out = heard + treble * (to_linear_factor(uniform_filter1d(shut_db, size=400)) - 1)
    return top_cut(out[None])


dry = scene()
out = record(dry)
to_wav(out)
```